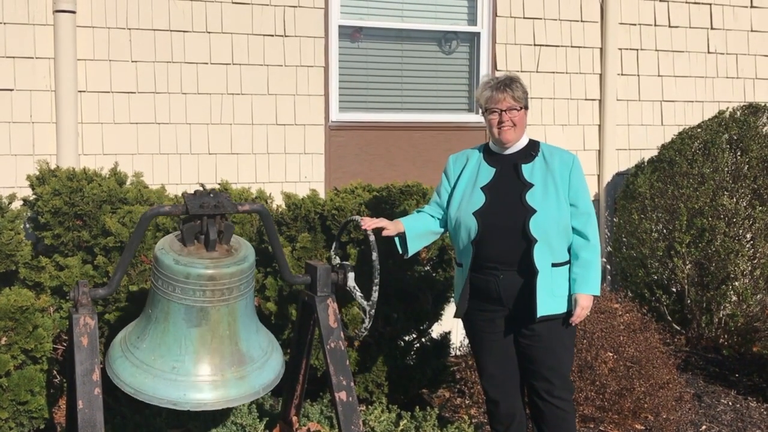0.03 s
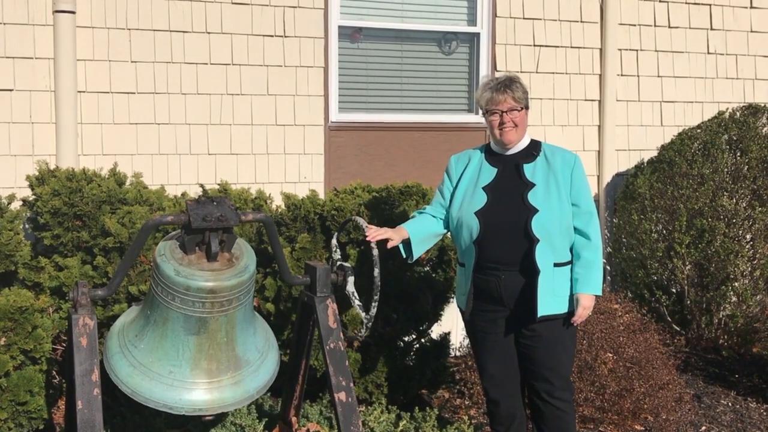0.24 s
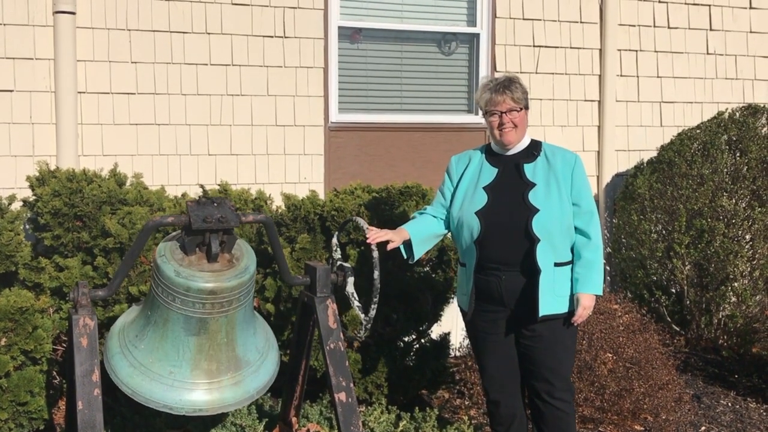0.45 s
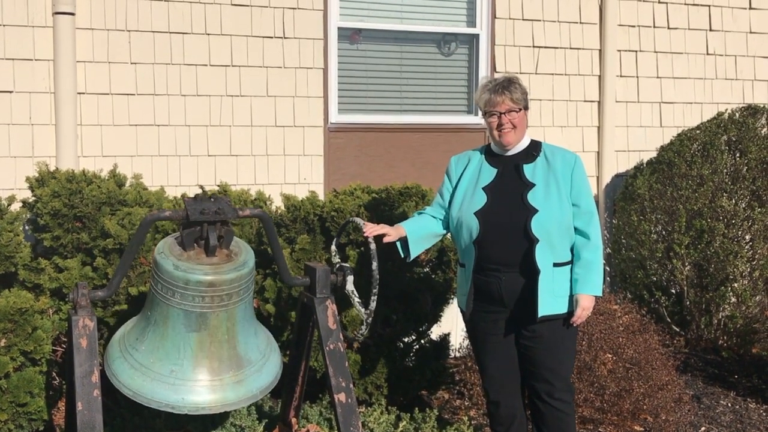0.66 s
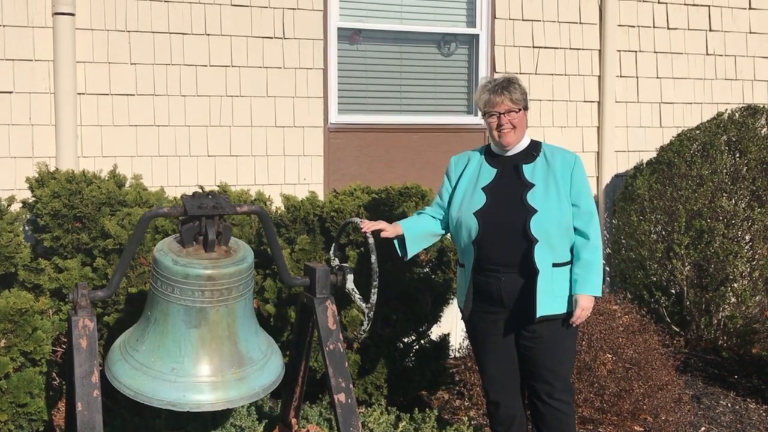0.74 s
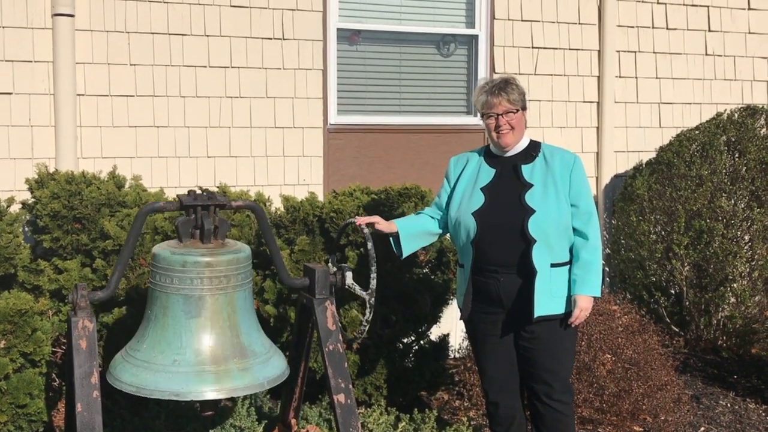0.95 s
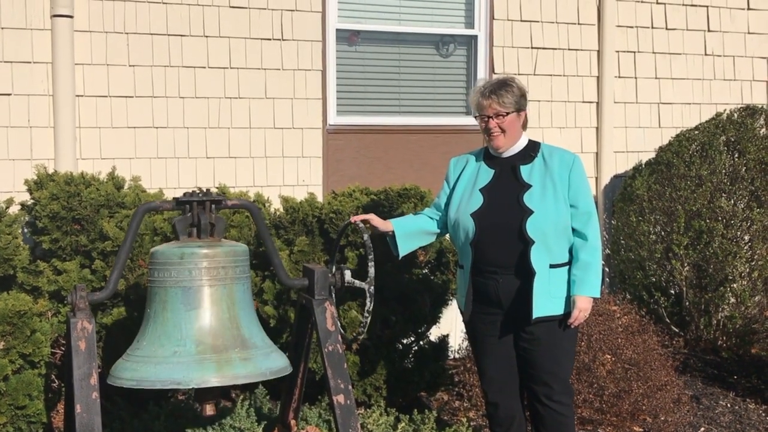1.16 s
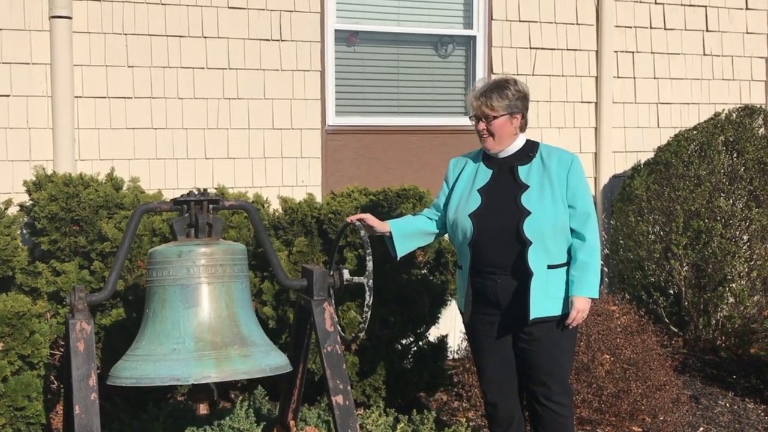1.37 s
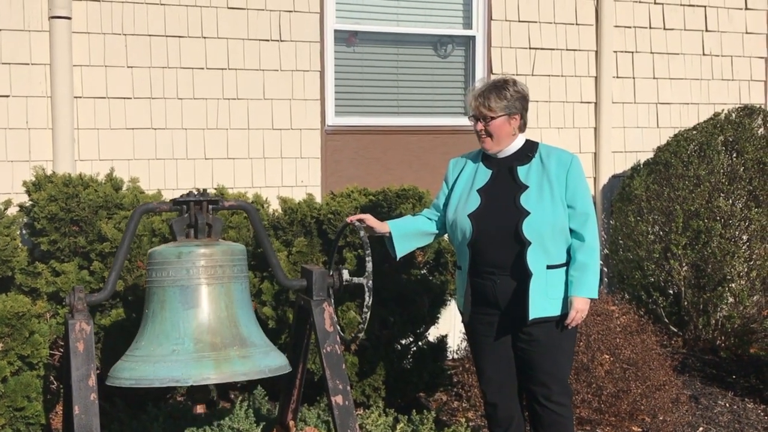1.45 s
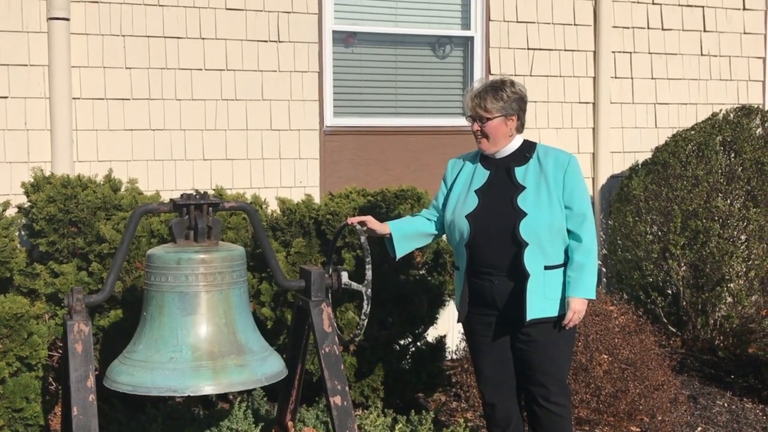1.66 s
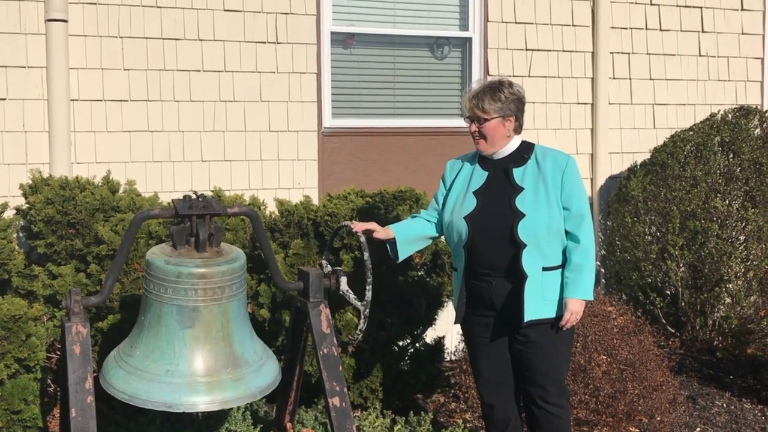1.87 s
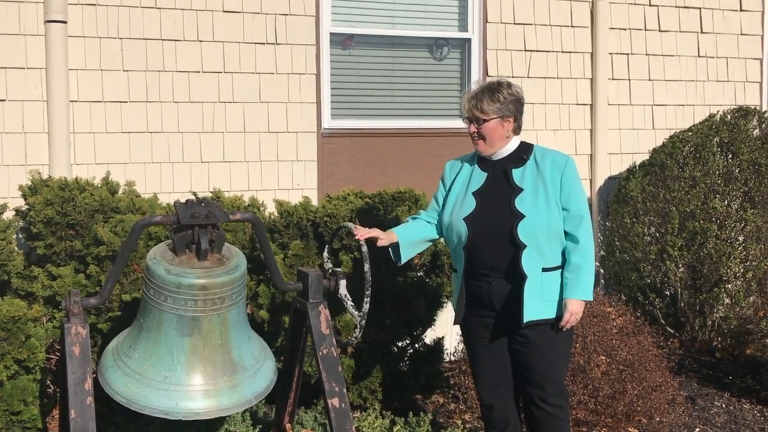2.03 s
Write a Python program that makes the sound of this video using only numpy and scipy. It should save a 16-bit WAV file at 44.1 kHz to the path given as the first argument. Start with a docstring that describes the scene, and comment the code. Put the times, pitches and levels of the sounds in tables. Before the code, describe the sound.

A large bronze bell is struck once and rings out with a slow warble.

```python
"""The low tones of an earlier blow still hum in a bronze bell, outdoors, close to a small microphone.
Then the clapper strikes once, hard enough to clip, and the bell rings out with slow warbles as its
paired tones beat. The iron yoke knocks and its axle squeaks softly. Wind puffs on the microphone
over a faint yard, a thin hiss and a low hum."""
import sys
import numpy as np
from scipy import signal
from scipy.fft import rfft, irfft
from scipy.io import wavfile

SR = 44100
rng = np.random.default_rng(int(sys.argv[2]) if len(sys.argv) > 2 else 0)


def log_audio(samples):
    """Write samples as a 16-bit WAV file to the path given in sys.argv[1]."""
    # one column per channel
    frames = np.atleast_2d(samples).T
    # limit to full scale, then quantise
    limited = np.clip(frames, -1, 1)
    pcm = np.round(limited * 32767).astype(np.int16)
    wavfile.write(sys.argv[1], SR, pcm)


N = 92610
TIME_S = np.arange(N) / SR
BIN_HZ = np.fft.rfftfreq(N, 1 / SR)
STRIKE_S, CONTACT_S = .2474, .0002  # when the clapper lands, and its contact time


def gain_of(db):
    return 10 ** (np.asarray(db) / 20)


def read(points, hz):
    """Interpolate a table along a logarithmic frequency axis."""
    pitches_hz, values = np.transpose(points)
    return np.interp(np.log(hz + 1), np.log(pitches_hz + 1), values)


def curve(points):
    return np.interp(TIME_S, *np.transpose(points))


def noise(colour):
    """Steady noise of rms 1 with the given spectrum."""
    x = irfft(rfft(rng.standard_normal(N)) * gain_of(read(colour, BIN_HZ)), N)
    return x / np.std(x)


def narrow(hz, width_hz):
    """Noise of rms 1 gathered round one frequency."""
    x = irfft(rfft(rng.standard_normal(N)) / (1 + ((BIN_HZ - hz) / width_hz * 2) ** 2), N)
    return x / np.std(x)


def low_hum():
    """A faint, wavering hum in the background."""
    return gain_of(-69.5) * narrow(hz=123, width_hz=3.4)


# Colours of the yard behind the bell, the hiss and the wind on the microphone: pitch_hz, level_db
YARD_COLOUR = [(40, -7), (120, -7), (250, -14), (500, -12), (900, -6.5), (2000, -23), (4000, -32.5),
               (8000, -54.5), (16000, -64.5)]
HISS_COLOUR = [(2500, -22.5), (5000, 1), (10000, -1), (16000, -5.5)]
WIND_COLOUR = [(15, -4), (30, 3.5), (55, -6.5), (100, -15), (250, -61), (1000, -91.5)]
# How each rises and falls: time_s, level_db
YARD_LEVELS = [(0, -59.5), (.1, -54), (.22, -52.5), (.55, -56.5), (.75, -54.5), (.95, -56.5), (1.1, -60),
               (1.7, -61.5), (1.95, -62.5), (2.1, -59)]
HISS_LEVELS = [(0, -91), (.12, -78), (.21, -72), (.54, -70), (.78, -69.5), (.87, -72.5), (.95, -84.5),
               (1.06, -91), (1.55, -87.5), (1.7, -91), (2.1, -93)]
WIND_LEVELS = [(0, -58), (.12, -53.5), (.25, -59), (.45, -58), (.9, -71), (1.5, -62), (1.6, -50),
               (1.72, -52.5), (1.81, -39.5), (1.88, -54), (2.1, -46)]


def outdoor_air():
    """The faint yard, a treble hiss, and wind buffeting the microphone in low puffs."""
    layers = [(YARD_LEVELS, YARD_COLOUR), (HISS_LEVELS, HISS_COLOUR), (WIND_LEVELS, WIND_COLOUR)]
    return sum(gain_of(curve(levels)) * noise(colour) for levels, colour in layers)


# Resonances of the axle: pitch_hz, width_hz, relative_db
AXLE_RESONANCES = [(1158, 5, 4), (1405, 15, 0), (2200, 60, -4), (3700, 200, -15), (4800, 400, -17)]


def axle_squeak(centre_s=1.43, spread_s=.08, level_db=-67):
    """The axle rubs faintly near one end of the swing."""
    rub = np.exp(-.5 * ((TIME_S - centre_s) / spread_s) ** 2)
    return rub * sum(gain_of(level_db + db) * narrow(hz, width) for hz, width, db in AXLE_RESONANCES)


# Knocks of the yoke that carries the bell: peak_s, level_db
YOKE_KNOCKS = [(0.176, -53.5), (0.70, -59), (0.725, -57.5), (0.79, -57), (0.95, -64), (1.8458, -49.5),
               (1.879, -52.5), (1.897, -59), (2.009, -53), (2.0425, -56)]
# Colour of the knocked iron: pitch_hz, level_db
IRON_COLOUR = [(300, -4.5), (600, -2), (1050, 5), (1500, -2), (2600, -8.5), (4500, -19), (7000, -32.5),
               (16000, -59.5)]


def yoke_knocks(rise_s=.003, t60_s=.15):
    """The iron yoke knocks softly: a quick rise, then a short noisy ring."""
    envelope = np.zeros(N)
    for peak_s, db in YOKE_KNOCKS:
        rise = np.clip((TIME_S - peak_s) / rise_s + 1, 0, 1)
        envelope += rise * gain_of(db - 60 * np.maximum(TIME_S - peak_s, 0) / t60_s)
    return envelope * noise(IRON_COLOUR)


# Colour of the blow from close by: pitch_hz, level_db
CLANG_COLOUR = [(60, -18), (150, -15.5), (400, -12.5), (1000, -10), (2500, 5), (5000, -13.5), (9000, -19),
                (16000, -49)]
# Ring time of its bands: pitch_hz, t60_s
CLANG_DECAY = [(60, .6), (400, .5), (1500, 0.5), (5000, 0.23), (16000, .25)]


def clapper_clang(level_db=-23.5):
    """The blow wakes a crowd of short modes and a thud in the yoke; each band dies at its own speed."""
    hz, frame_s, bands = signal.stft(noise(CLANG_COLOUR), SR, nperseg=512)
    decay = gain_of(-60 * np.maximum(frame_s - STRIKE_S, 0) / read(CLANG_DECAY, hz)[:, None])
    clang = signal.istft(bands * decay, SR, nperseg=512)[1][:N]
    return gain_of(level_db) * clang * np.clip((TIME_S - STRIKE_S) / CONTACT_S, 0, 1)


# Tones left in the bell by the earlier blow: pitch_hz, level_db, swell_db_per_s
LINGERING_MODES = [(338.4, -40.5, -2.5), (624, -49, 12), (770.4, -37.5, 2)]


def lingering_tones():
    """The bell's low modes hum on, each swelling or fading until the strike."""
    tones = np.zeros(N)
    for hz, db, swell in LINGERING_MODES:
        envelope = gain_of(db + swell * np.minimum(TIME_S, STRIKE_S))
        tones += envelope * np.sin(2 * np.pi * (hz * TIME_S + rng.random()))
    return tones


def ring(hz, db, t60_s, age_s, lead_turns=0):
    """One ringing tone: a sine that falls 60 dB in t60_s."""
    return gain_of(db - 60 * age_s / t60_s) * np.sin(2 * np.pi * (hz * age_s + lead_turns))


# Ringing tones of the bell, close to the microphone: pitch_hz, level_db, t60_s, twin_pitch_hz,
# twin_level_db, twin_t60_s, twin_lead_turns, lean_db, lean_squared_db
# The 3803 Hz tone is a harsh clipping overtone of the strike note.
PAIRED_TONES = [(339.01, -31.68, 40.0, 338.45, -44.61, 40.0, 0.21, -1.74, 1.2),
                (625.5, -28.87, 14.16, 624.68, -44.47, 21.55, 0.16, 0.0, 0.0),
                (766.17, -19.29, 12.6, 767.31, -21.46, 4.38, 0.46, -1.08, -1.03),
                (1006.97, -41.4, 5.62, 1007.93, -40.19, 3.29, 0.51, 0.0, 0.0),
                (1266.78, -10.68, 1.75, 1268.89, -27.48, 2.53, 0.73, 0.0, 0.0),
                (1681.25, -34.3, 1.66, 1677.91, -35.84, 1.19, 0.48, -1.06, -1.37),
                (1704.66, -23.58, 1.28, 1698.35, -18.94, 0.84, 0.99, -7.42, 0.69),
                (1725.48, -25.24, 1.19, 1723.35, -14.55, 0.75, 0.54, -7.83, 0.58),
                (1881.53, -30.73, 0.64, 1886.65, -42.97, 1.12, 0.26, -7.16, 12.0),
                (2147.46, -20.01, 1.33, 2146.88, -23.09, 1.53, 0.37, 0.0, 0.0),
                (2409.07, -39.48, 1.5, 2408.02, -42.12, 1.33, 0.32, -8.52, 0.22),
                (2455.64, -66.84, 7.07, 2454.43, -59.96, 3.9, 0.25, 6.4, -0.44),
                (2574.61, -22.22, 1.67, 2572.91, -30.38, 1.48, 0.56, -8.89, -0.32),
                (2893.51, -38.42, 2.16, 2892.0, -55.94, 3.73, 0.56, 2.28, -3.7),
                (3336.47, -42.83, 3.29, 3335.65, -50.52, 3.83, 0.79, 4.92, 0.3),
                (4131.16, -39.23, 1.79, 4129.7, -59.42, 2.29, 0.6, -0.72, -1.83),
                (4240.69, -47.92, 1.03, 4238.67, -28.67, 0.96, 0.84, 3.06, -12.0),
                (4503.3, -27.46, 0.92, 4501.68, -37.18, 1.15, 0.66, -12.0, -6.7),
                (3803.06, -22.64, 1.04, 3799.63, -29.65, 1.12, 0.26, -12.0, -8.13),
                (4977.33, -41.11, 0.87, 4967.13, -46.38, 1.54, 0.74, -2.56, -10.3)]
# Modes that ring alone: pitch_hz, level_db, t60_s
LONE_MODES = [(3095.1, -29.5, 1.25), (3683, -42, .5), (5520, -60, 1.3), (5810, -62, 1), (6508, -55, .4)]
# Third tones beating against four of the pairs: pitch_hz, level_db, t60_s, lead_turns
THIRD_MODES = [(623.33, -42.81, 40.0, 0.03), (1006.27, -58.9, 40.0, 0.67), (1267.52, -17.17, 1.73, 0.2),
               (2151.74, -62.12, 7.36, 0.41)]


def bell(swing_period_s=2.2, swing_end_s=.45, swing_m=.05, bloom_db=1, bloom_s=.15):
    """The blow cuts the old hum short; paired tones beat and beam their own way as the bell swings."""
    lean = np.cos(2 * np.pi * (TIME_S - swing_end_s) / swing_period_s)
    age_s = np.maximum(TIME_S - STRIKE_S, 0)
    struck = np.minimum(age_s / CONTACT_S, 1)
    # The changing distance to the microphone bends the pitch slightly.
    age_s = age_s - swing_m / 343 * (lean - lean[round(STRIKE_S * SR)])
    tones = np.zeros(N)
    for hz, db, t60, twin_hz, twin_db, twin_t60, lead, lean_db, lean_squared_db in PAIRED_TONES:
        beam = gain_of(lean_db * lean + lean_squared_db * lean ** 2)
        tones += beam * (ring(hz, db, t60, age_s) + ring(twin_hz, twin_db, twin_t60, age_s, lead))
    tones += sum(ring(hz, db, t60, age_s) for hz, db, t60 in LONE_MODES)
    tones += sum(ring(hz, db, t60, age_s, lead) for hz, db, t60, lead in THIRD_MODES)
    bloom = gain_of(bloom_db * np.exp(-age_s / bloom_s))  # extra strength just after the blow
    return struck * bloom * tones + (1 - struck) * lingering_tones()


def scene():
    return (bell() + clapper_clang() + yoke_knocks() + axle_squeak() + outdoor_air() + low_hum())[None]


def record(dry, clip_level=.26, cutoff_hz=15900):
    """The blow clips hard at the small microphone, then the highest treble is cut off."""
    clipped = np.clip(dry, -clip_level, clip_level)
    lowpass = signal.firwin(511, cutoff_hz, window=("kaiser", 9), fs=SR)
    return signal.oaconvolve(clipped, lowpass[None], "same")


dry = scene()
out = record(dry)
log_audio(out)
```